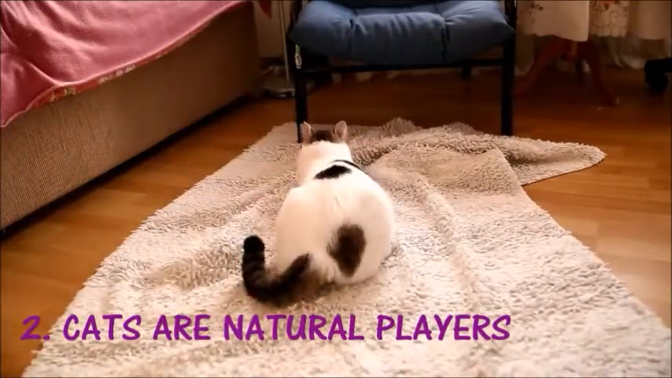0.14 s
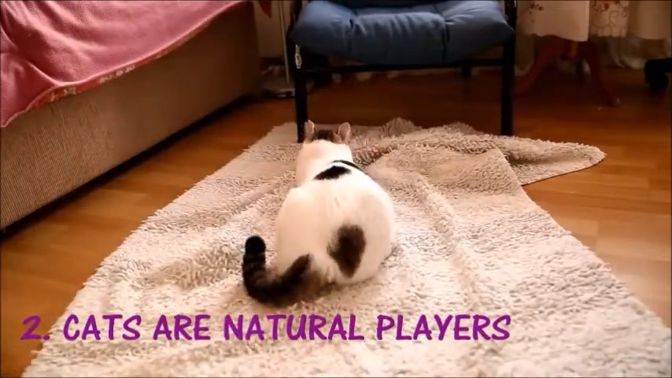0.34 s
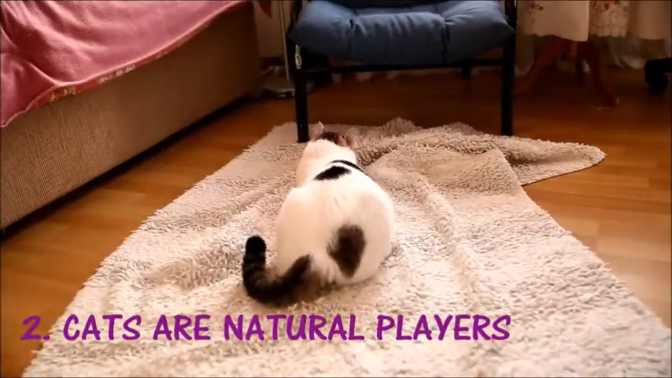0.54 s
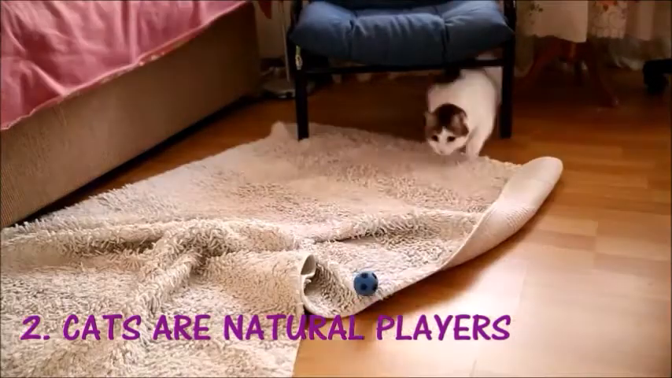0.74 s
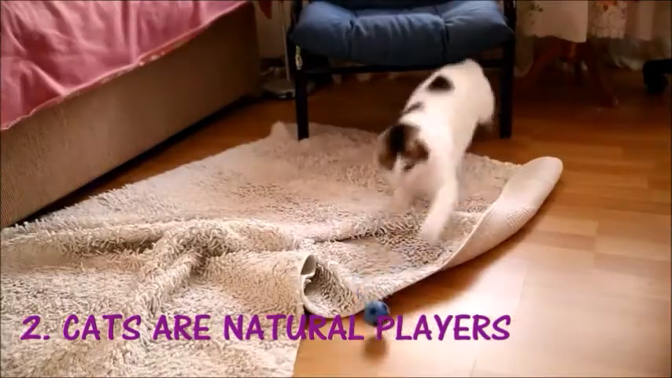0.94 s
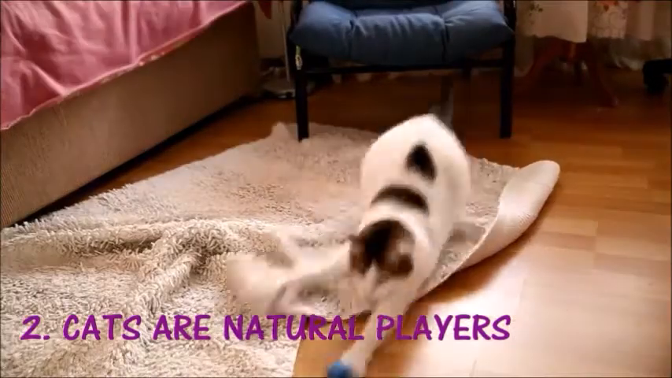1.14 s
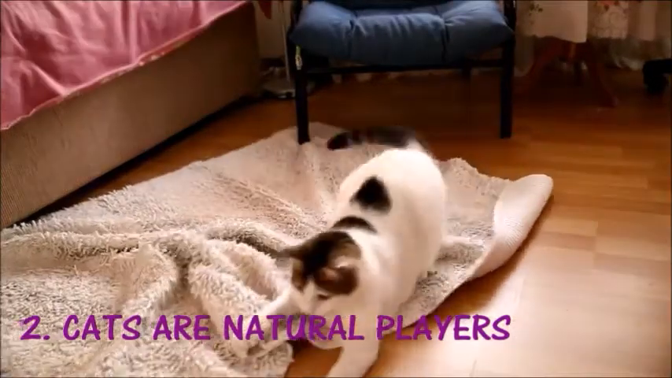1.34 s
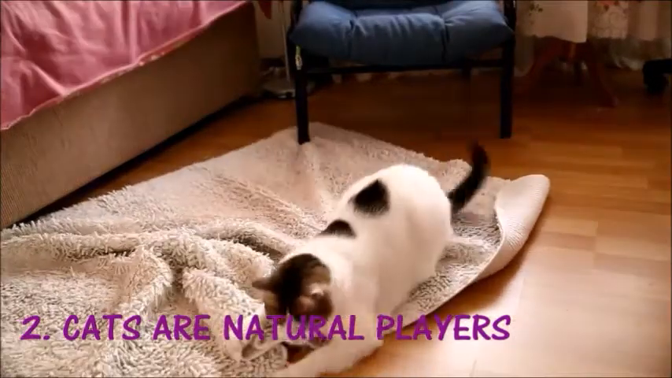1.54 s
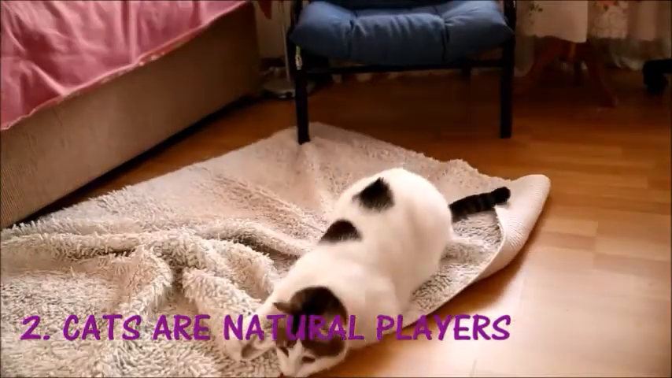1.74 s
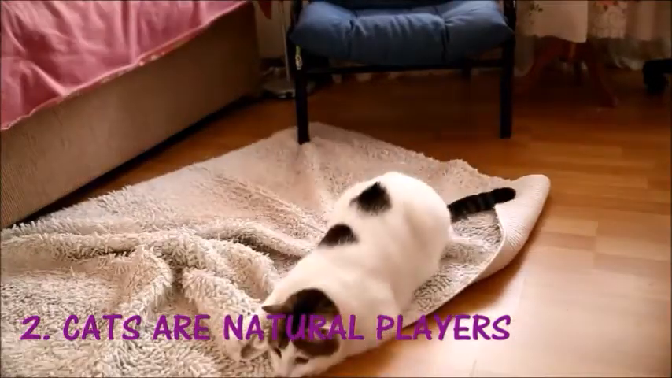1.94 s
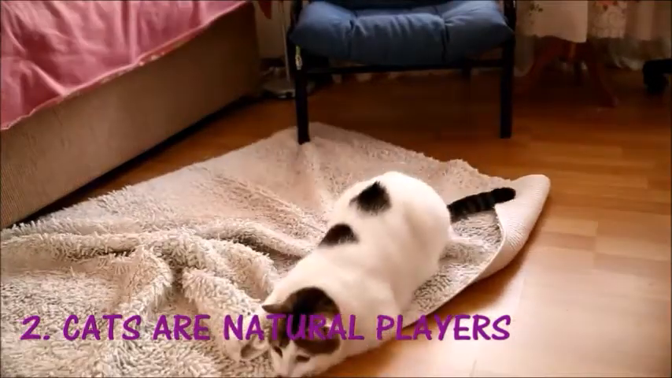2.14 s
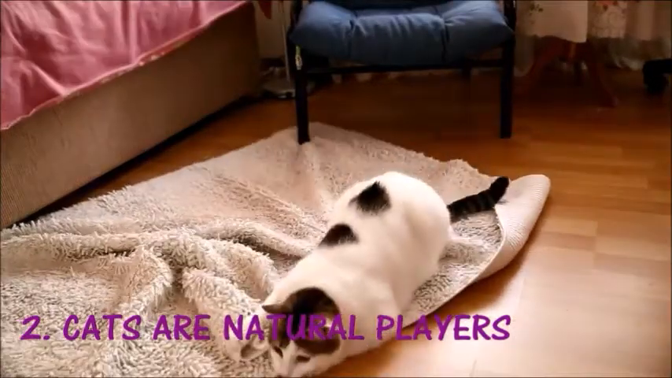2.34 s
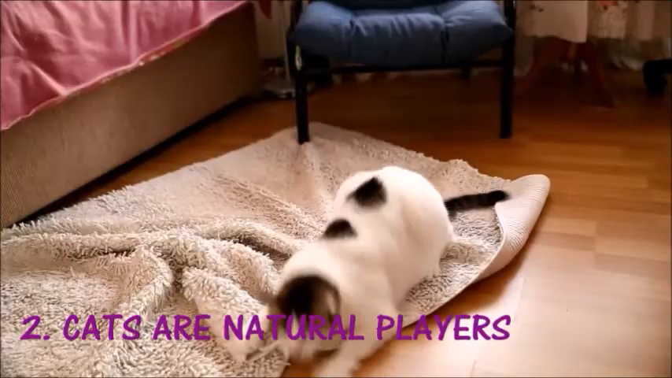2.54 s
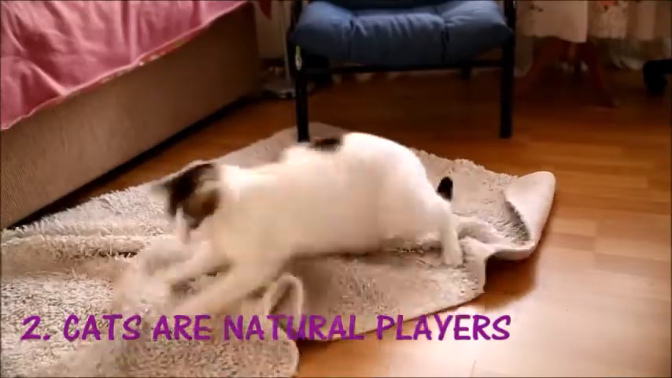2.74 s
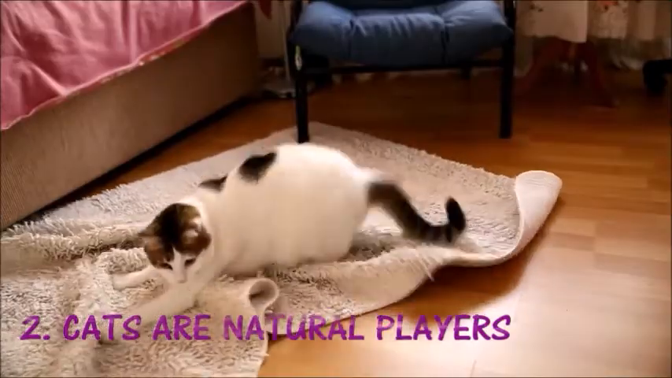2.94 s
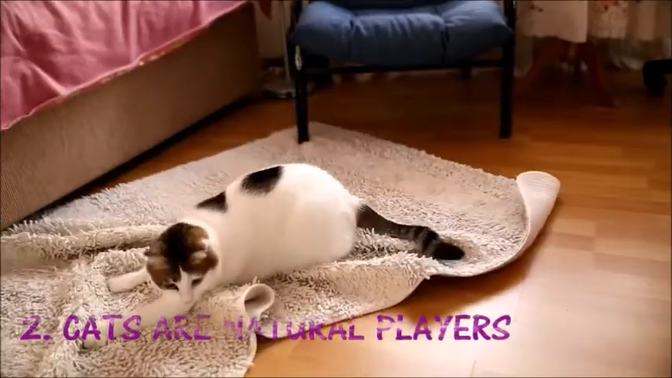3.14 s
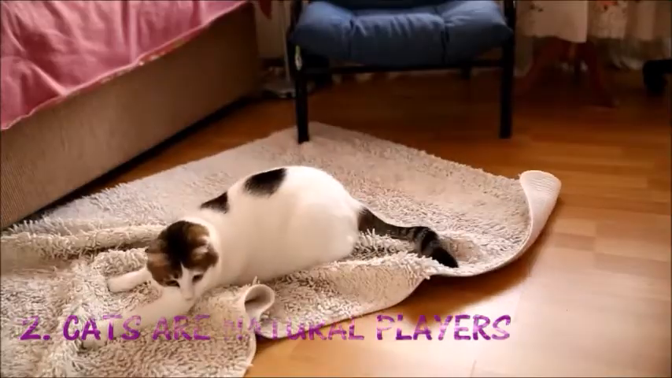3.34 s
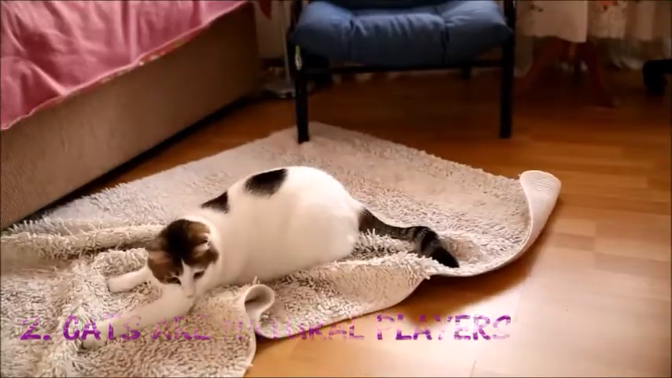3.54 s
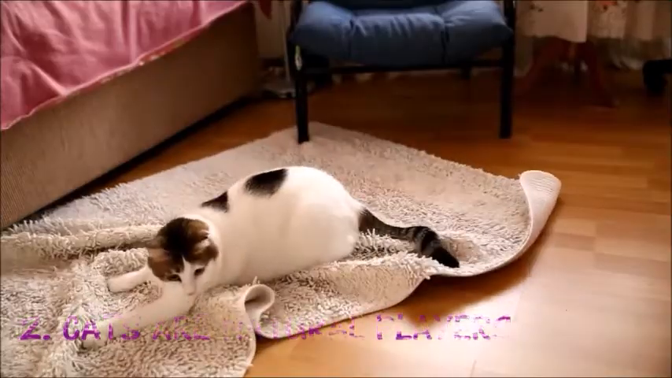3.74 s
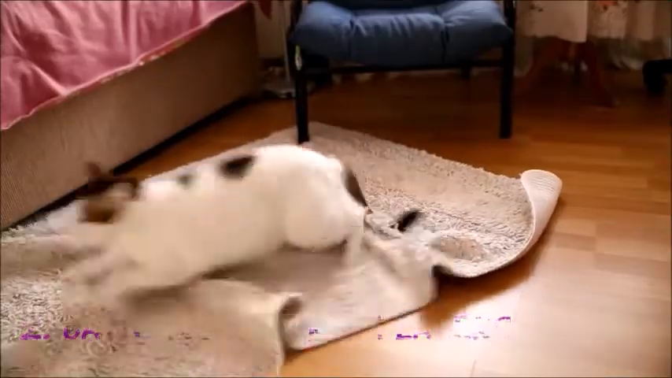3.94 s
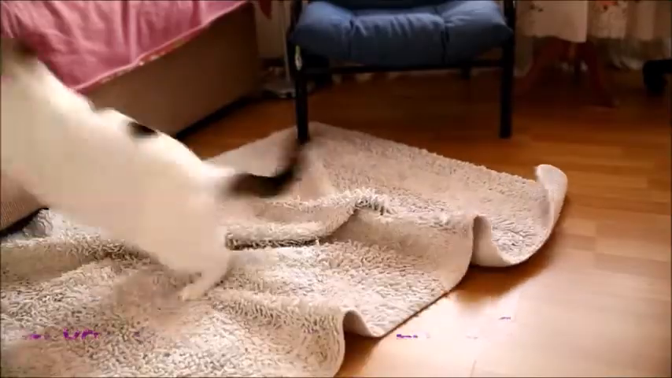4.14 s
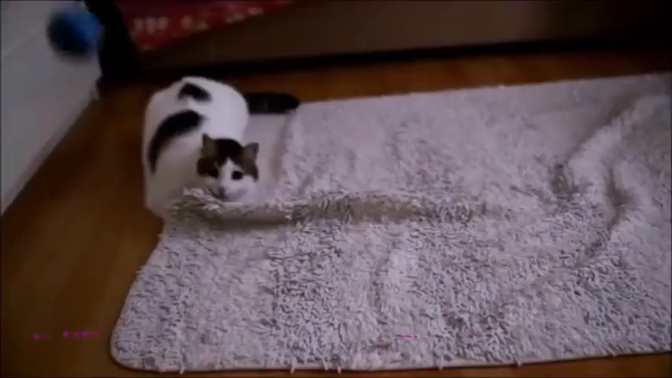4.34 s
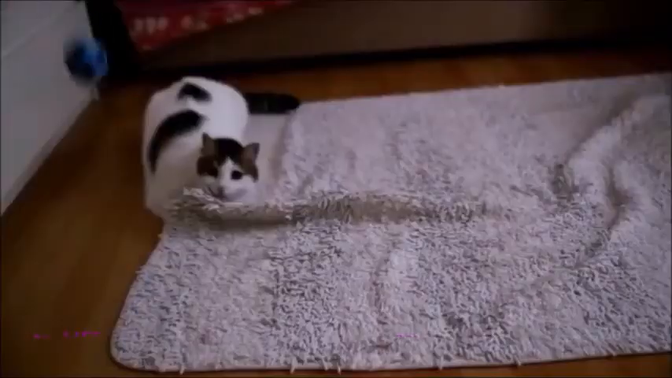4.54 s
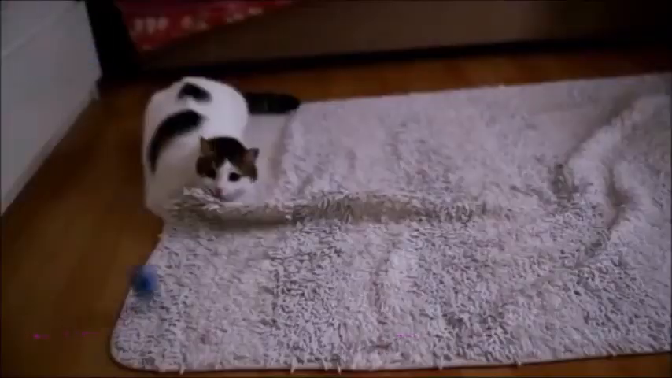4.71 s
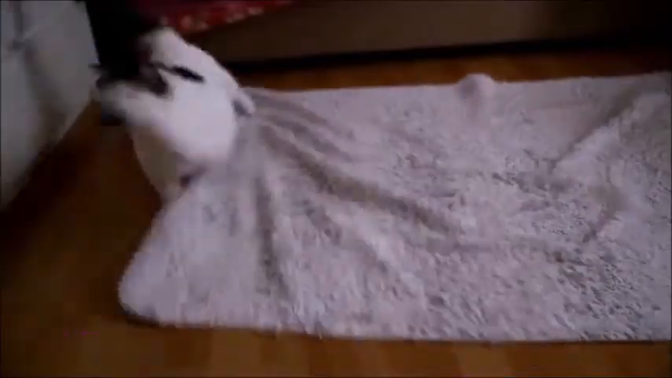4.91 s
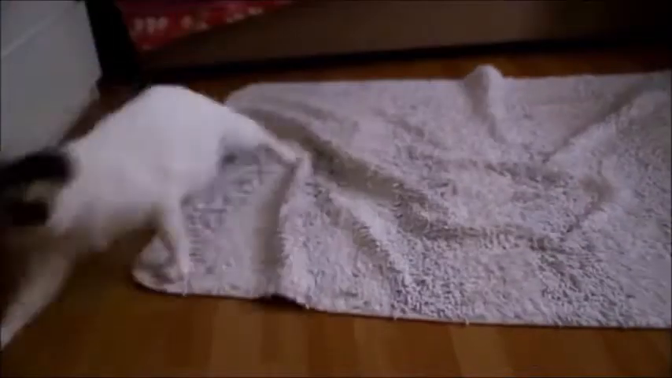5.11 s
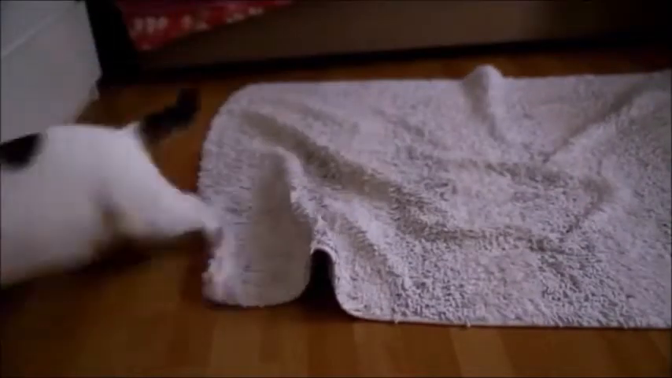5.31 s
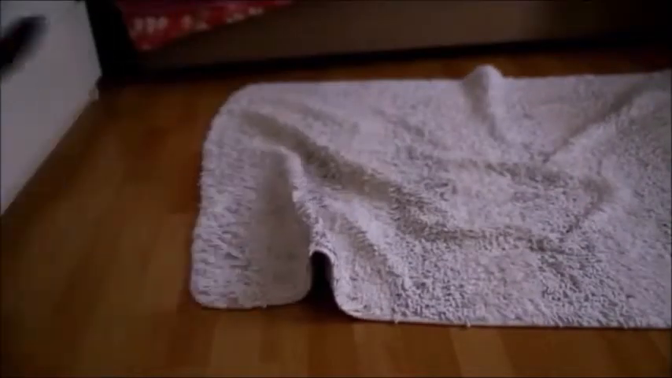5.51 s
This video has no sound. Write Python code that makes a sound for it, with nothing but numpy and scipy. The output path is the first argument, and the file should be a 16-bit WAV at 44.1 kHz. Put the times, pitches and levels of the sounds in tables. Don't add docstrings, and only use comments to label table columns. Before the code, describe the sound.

Room hush and faint hiss come first, then short woody knocks and thuds heard at a distance, with faint brushing of pile. Brief near-silences frame a repeat of the first few hits. One isolated knock breaks the next pause. The ending is close and much louder: rapid floor knocks, crisp claw snags in wool, rug rumble and soft hollow paw thumps.

```python
import sys
import numpy as np
from scipy import signal
from scipy.fft import rfft, irfft, next_fast_len
from scipy.io import wavfile
from scipy.ndimage import uniform_filter1d, map_coordinates

SR = 44100
rng = np.random.default_rng(int(sys.argv[2]) if len(sys.argv) > 2 else 0)


def boost(x):
    u = np.asarray(x, float) / 20
    return 10 ** u


def to_wav(sig):
    pcm = np.clip(np.atleast_2d(sig), -1, 1) * 32767
    pcm = np.round(pcm).astype(np.int16)
    wavfile.write(sys.argv[1], SR, pcm.T)


N = 245592
LAST_SHOT = 4.3


def unit(x):
    return x / np.sqrt(np.mean(x ** 2) + 1e-20)


def crest(x):
    return x / abs(x).max()


def along(points, hz):
    f, value = np.transpose(points)
    return np.interp(np.log(hz + 1), np.log(f + 1), value)


def filtered(x, response):
    size = next_fast_len(len(x) + 8192)
    return irfft(rfft(x, size) * response(np.fft.rfftfreq(size, 1 / SR)), size)[:len(x)]


def resonance(f, hz, width_hz):
    return 1j * f * width_hz / (hz * hz - f * f + 1j * f * width_hz)


def wobble(rate):
    return map_coordinates(rng.standard_normal(N // 20), [np.arange(N) * rate / SR])


def patchy(patchy_db):
    z = signal.stft(rng.standard_normal(N + 256), nperseg=256)[2]
    field = uniform_filter1d(rng.standard_normal(z.shape), size=8, axis=0)
    field = uniform_filter1d(field, size=6, axis=1)
    return signal.istft(z * boost(patchy_db * unit(field)), nperseg=256)[1][:N]


# start in seconds, peak level in dB,
# knock pitch in Hz, tick level in dB, thud level in dB (tick and thud against the knock).
FAR_KNOCKS = [(0.4741, -26, 1200, -2.5, -5), (0.5616, -21.5, 435, -38, -12), (0.7399, -33.5, 890, 3.5, -28),
              (0.818, -28.5, 560, -10, -12), (0.8666, -37, 382, 2, -13), (0.8757, -34, 374, -38, -2.5),
              (0.985, -31.5, 630, -3, -6.5), (0.9961, -33, 650, 4.5, -14), (1.0039, -28, 720, -4, -25),
              (1.0632, -42, 477, 7.5, -7), (1.1713, -22, 574, -17, -17), (1.2092, -35, 510, -7, -11),
              (1.3208, -28.5, 586, -30, -18), (1.3939, -26.5, 437, -22, -10.5),
              (1.4411, -36, 460, -13, -31), (1.5776, -50, 384, -20, 3), (1.5841, -36.5, 240, -7, -0.5),
              (1.6741, -37.5, 594, 3.5, -7), (1.7783, -33, 340, -9, -5.5), (1.8248, -26.5, 815, -23, -15),
              (1.8274, -28, 442, -16, -11), (3.6948, -25.5, 564, -3.5, -10)]
NEAR_KNOCKS = [(4.3381, -30, 710, -20, -8), (4.4597, -24.5, 1180, -6, -8), (4.5169, -37, 610, 2, -20),
               (4.5994, -12.5, 720, -7, -18.5), (4.612, -14.5, 624, -12, -15.5), (4.708, -10, 645, -2, -24),
               (4.8145, -13.5, 630, -18.5, -27), (5.0087, -25, 1380, 2, -3.5),
               (5.0689, -11.5, 1400, 2, -42), (5.0706, -16, 1180, -33, -23),
               (5.1323, -19.5, 610, -20, -9.5), (5.168, -26, 834, -9, -11), (5.299, -42, 607, -8, 13),
               (5.3576, -15.5, 750, 5, -8), (5.4391, -15, 560, -24, -16), (5.5376, -16, 490, -27.5, -6),
               (5.5458, -14.5, 544, -25, -0.5)]


def knocks():
    out = np.zeros(N + SR)
    t = np.arange(SR // 10) / SR
    blow = np.hanning(11)
    blow = np.pad(blow, (0, len(t) - len(blow)))
    thud = crest(filtered(boost(-60 * t / 0.0033), boards))
    for start, db, hz, tick_db, thud_db in FAR_KNOCKS + NEAR_KNOCKS:
        near = start > LAST_SHOT
        knock = crest(filtered(blow, lambda f: resonance(f, hz, 0.83 * hz) ** 3))
        scratch = rng.standard_normal(len(t)) * boost(-60 * t / 0.021)
        tick = crest(filtered(blow + 1.17 * scratch, lambda f: resonance(f, 2430, 3160) ** 3))
        hit = knock + boost(tick_db - 3) * tick + boost(thud_db) * thud
        tail = signal.fftconvolve(hit, walls())
        room_db = -4 if near else -6
        wet = boost(room_db) * filtered(tail, lambda f: hollow(f, near))
        first = round(start * SR)
        out[first:][:len(t)] += boost(db) * hit
        out[first:][:len(wet)] += boost(db) * wet
    return filtered(out[:N], lambda f: 1 / (1 + 1j * f / 11000) ** 4)


# pitch in Hz, width in Hz, level in dB.
BOARD_MODES = [(70, 28.4, -0.5), (119, 223, 1.5), (201.8, 28.8, 9.5), (305, 95, -1.5), (570, 23, -15.5)]


def boards(f):
    modes = enumerate(BOARD_MODES)
    return sum((-1) ** k * boost(db) * resonance(f, hz, width) for k, (hz, width, db) in modes)


# frequency in Hz, time to fall 60 dB in seconds.
ROOM_DECAY = [(60, 0.91), (500, 0.25), (2000, 0.28), (10000, 0.2)]


def walls():
    hz, t, z = signal.stft(rng.standard_normal(SR // 2), SR, nperseg=128)
    fade = boost(-60 * t / along(ROOM_DECAY, hz)[:, None])
    tail = signal.istft(z * fade, SR, nperseg=128)[1]
    tail = tail * (1 - np.exp(-np.arange(len(tail)) / SR / 0.0016))
    return tail / np.linalg.norm(tail)


# pitch in Hz, width in Hz,
# boost in dB with the microphone far, boost in dB with it near.
FLOOR_HOLLOW = (533, 78, 0.4, 4.9)


def hollow(f, near):
    hz, width_hz, far_db, near_db = FLOOR_HOLLOW
    return 1 + boost(near_db if near else far_db) * resonance(f, hz, width_hz)


# start in seconds, peak level in dB, centre in Hz, length in seconds.
CLAW_SNAGS = [(0.724, -33, 8200, 0.0053), (0.731, -33.5, 8000, 0.015), (1.136, -52, 8800, 0.011),
              (3.694, -44, 7760, 0.0054), (4.35, -21, 8000, 0.0069), (4.439, -22.5, 6600, 0.0065),
              (4.5996, -22.5, 8250, 0.014), (4.617, -20.5, 8200, 0.013), (4.648, -25, 5900, 0.009),
              (4.705, -24, 9200, 0.0093), (4.869, -22.5, 9200, 0.017), (4.889, -18, 8600, 0.018),
              (4.979, -21, 9300, 0.045), (5.068, -20, 9100, 0.0054), (5.266, -27.5, 8300, 0.027),
              (5.302, -34, 5460, 0.0091), (5.365, -28, 5900, 0.013), (5.532, -31.5, 5650, 0.017)]
# start in seconds, peak level in dB, centre in Hz, length in seconds.
PAW_SCUFFS = [
    (0.7235, -31.5, 2730, 0.011),
    (0.7484, -30, 4200, 0.007),
    (3.388, -50, 2090, 0.013),
    (4.355, -13.5, 3980, 0.0036),
    (4.895, -23, 3370, 0.028),
    (5.011, -23, 492, 0.021),
    (5.367, -13, 570, 0.052),
    (5.431, -13.5, 570, 0.023),
    (5.4523, -14, 537, 0.022),
    (5.5471, -10.5, 553, 0.02),
]


def snags():
    out = np.zeros(N + SR)
    t = np.arange(SR // 10) / SR
    for start, db, hz, length in CLAW_SNAGS + PAW_SCUFFS:
        noise = rng.standard_normal(len(t))
        rip = unit(filtered(noise, lambda f: resonance(f, hz, .55 * hz) ** 3))
        u = t / length
        swell = u ** 0.78 * np.exp(-2.2 * u * u - u)
        out[round(start * SR):][:len(t)] += boost(db + 0.5) * rip * swell
    return filtered(out[:N], lambda f: 1 / (1 + (f / 11500) ** 10))


def fibres(spectrum, rate, grain_db, patchy_db):
    chance = rng.random(N)
    size = np.clip(rng.standard_normal(N), -3, 3)
    grains = (chance < rate / SR) * size * abs(size)
    rough = patchy(patchy_db) + boost(grain_db) * unit(grains)
    return unit(filtered(rough, lambda hz: boost(along(spectrum, hz))))


def strokes(rows, narrow=1):
    now, power = np.arange(N) / SR, np.zeros(N)
    for peak, db, rise, fall in rows:
        around = slice(max(round((peak - .3) * SR), 0), round((peak + .3) * SR))
        away = now[around] - peak
        u = np.where(away < 0, -away / rise, away / fall)
        power[around] += boost(db - narrow * 10 * u ** 1.47) ** 2
    return np.sqrt(power)


# frequency in Hz, level in dB per Hz.
DRAG_COLOUR = [(40, -60), (60, -10), (120, -1), (240, -3.5), (330, 4.5), (700, -7), (1200, -11),
               (1800, -25), (3500, -55)]
# frequency in Hz, level in dB per Hz.
BRUSH_COLOUR = [(250, -70), (600, 2), (900, -2), (1900, -5), (3500, -4), (6700, -13.5), (8500, -14),
                (11000, -52)]
# frequency in Hz, level in dB per Hz.
RAKE_COLOUR = [(3240, -12), (5500, -7.5), (6780, -12.5), (8390, -7), (9550, -5.5), (12100, -16.5),
               (13100, -21.5), (14700, -29), (15600, -46)]
# peak time in seconds, level in dB, rise in seconds, fall in seconds.
RUG_SHOVES = [(.515, -40.5, 0.038, 0.076), (.585, -33, 0.066, 0.057), (.77, -38.5, 0.031, 0.049),
              (.86, -34.5, 0.042, 0.06), (.93, -46, .04, 0.083), (1.055, -39, 0.088, 0.066),
              (1.2, -34.5, 0.028, 0.037), (1.29, -51, .06, 0.1), (1.45, -42, 0.049, 0.05),
              (1.585, -33, 0.027, 0.045), (1.73, -41.5, 0.093, 0.061), (1.88, -38.5, 0.096, 0.033),
              (1.97, -57, .06, 0.085), (3.74, -49, 0.031, 0.028), (4.345, -41, 0.019, .035),
              (4.41, -49, .04, 0.092), (4.53, -32, 0.06, 0.023), (4.64, -25, 0.025, 0.033),
              (4.755, -25.5, 0.064, 0.021), (4.855, -25, 0.044, 0.018), (4.95, -38, 0.03, 0.038),
              (5.02, -31.5, 0.017, 0.025), (5.085, -24.5, 0.014, 0.032), (5.175, -34.5, 0.09, 0.033),
              (5.28, -50, .04, .06), (5.395, -34, .02, .025), (5.46, -46, .04, .07),
              (5.565, -21, 0.02, .04)]
# peak time in seconds, level in dB,
# rise in seconds, fall in seconds, claws over pile in dB.
FAR_SWEEPS = [(.475, -61, 0.0067, 0.034, -14), (.62, -57.5, 0.14, 0.21, -7),
              (.74, -46.5, 0.053, 0.071, -8.5), (.89, -52, .03, 0.054, -10.5),
              (.945, -56, 0.067, 0.046, 1.5), (.995, -48, 0.053, 0.081, -6.5),
              (1.2, -53.5, 0.076, 0.12, -2.5), (1.36, -56.5, .09, 0.14, -3.5), (1.47, -54, 0.047, 0.12, -3),
              (1.58, -51, 0.18, 0.097, -3.5), (1.72, -58.5, 0.15, 0.094, -8), (1.84, -53, 0.13, 0.093, -5),
              (1.97, -63, 0.1, 0.18, -6.5), (3.71, -59.5, 0.014, .065, -18)]
NEAR_SWEEPS = [(4.368, -37.5, 0.022, .05, -6), (4.455, -37, 0.059, 0.092, -6),
               (4.629, -33.5, 0.02, .055, -5), (4.725, -42, 0.078, 0.066, -9.5),
               (4.85, -50, 0.095, .04, 1.5), (4.905, -34, 0.032, 0.058, -1.5),
               (4.955, -39.5, 0.035, .035, -11), (5.014, -41, 0.1, 0.043, 3.5),
               (5.12, -45.5, 0.061, 0.039, -9), (5.205, -38.5, 0.045, 0.05, -2),
               (5.28, -43.5, 0.022, 0.051, -3), (5.368, -35, 0.013, 0.029, -14),
               (5.44, -40, .05, 0.085, -11), (5.545, -41.5, 0.015, 0.022, -15)]


def rug():
    drag = fibres(DRAG_COLOUR, 340, grain_db=-15, patchy_db=3) * boost(0.85 * wobble(30))
    brush = fibres(BRUSH_COLOUR, 1200, grain_db=-11, patchy_db=1.5) * boost(wobble(70))
    rake = fibres(RAKE_COLOUR, 2200, grain_db=-1.5, patchy_db=4.5) * boost(wobble(82))
    now = np.arange(N) / SR
    near_drag = unit(filtered(drag, lambda f: hollow(f, True) * (1j * f / (330 + 1j * f)) ** 3))
    drag = np.where(now < LAST_SHOT, drag, near_drag)
    sweeps = np.array(FAR_SWEEPS + NEAR_SWEEPS)
    pile = sweeps[:, :4]
    clawed = pile + np.outer(sweeps[:, 4], [0, 1, 0, 0])
    out = boost(-5) * drag * strokes(RUG_SHOVES)
    out += boost(-.3) * brush * strokes(pile)
    out += boost(-1) * rake * strokes(clawed, narrow=1.41)
    return out * ((now < SHOT_GAPS[0][0]) | (now > SHOT_GAPS[1][1]))


# start in seconds, peak level in dB, pitch in Hz,
# time to fall 60 dB in seconds.
WEIGHT_DROP = (1.82, -50, 56, .5)


def body():
    start, db, hz, t60 = WEIGHT_DROP
    t = np.clip(np.arange(N) / SR - start, 0, None)
    return boost(db - 60 * t / t60) * (1 - np.exp(-t / .03)) * np.sin(2 * np.pi * hz * t)


# frequency in Hz, level in dB per Hz.
HUSH_COLOUR = [(20, -42), (44, -2), (122, -8.5), (250, -7.5), (390, -12), (700, -10.5), (900, -13.5),
               (1150, -15.5), (2000, -19.5), (4500, -25.5), (6000, -39.5), (9000, -47)]
# frequency in Hz, level in dB per Hz.
HISS_COLOUR = [(2000, -60), (4000, -23), (6000, -2), (8200, -2.5), (9000, -5), (10200, -3), (10700, 0),
               (13300, -2.5), (14000, -6), (15700, -17)]
# pitch in Hz, width in Hz, rms level in dB.
DRONES = [(558, 52, -65.5), (650, 46, -84), (785.4, 75, -65), (874, 58, -67)]


def room_tone():
    out = boost(-61.5) * unit(filtered(patchy(1.0), lambda hz: boost(along(HUSH_COLOUR, hz))))
    out = out + boost(-78) * unit(filtered(patchy(1.5), lambda hz: boost(along(HISS_COLOUR, hz))))
    for hz, width_hz, db in DRONES:
        drone = filtered(rng.standard_normal(N), lambda f: resonance(f, hz, width_hz) ** 2)
        out = out + boost(db) * unit(drone * boost(3 * wobble(6)))
    return out


def scene():
    action = filtered(knocks() + snags() + rug(), lambda f: (1j * f / (45 + 1j * f)) ** 3)
    thin = filtered(action, lambda f: (1j * f / (140 + 1j * f)) ** 2)
    action = np.where(np.arange(N) < LAST_SHOT * SR, action, thin)
    mono = action + body() + room_tone()
    return np.array([mono, mono])


def coarse(x, contrast):
    hz, _, z = signal.stft(x, SR, nperseg=1024)
    local = np.sqrt(abs(uniform_filter1d(abs(z) ** 2, size=16, axis=0))) + 1e-12
    share = contrast * np.clip((hz[:, None] - 3000) / 4000, 0, 1)
    return signal.istft(z * (abs(z) / local) ** share, SR, nperseg=1024)[1][:N]


def low_pass(x):
    return signal.sosfilt(signal.butter(12, 15700, fs=SR, output="sos"), x)


# start in seconds, end in seconds.
SHOT_GAPS = [
    (2.028, 2.060),
    (2.996, 3.028),
]
# frequency in Hz, side over mid in dB.
SIDE_LEVEL = [(60, -59), (110, -60), (200, -63), (380, -51), (700, -58), (1290, -52), (2380, -39),
              (4400, -23), (8120, -16.5), (15000, -3.5)]


def record(dry):
    mid = dry[0] / (1 + abs(dry[0] / .3) ** 4) ** (1 / 4)
    mid = filtered(coarse(mid, contrast=0.52), lambda hz: hz < 15720)
    replay_lag, replay_end = 94095, 133000
    mid[replay_lag:replay_end] = mid[:replay_end - replay_lag]
    for start, end in SHOT_GAPS:
        mid[round(start * SR):round(end * SR)] *= boost(-41.5)
    hz, _, z = signal.stft(mid, SR, nperseg=256)
    random_phase = np.exp(2j * np.pi * rng.random(z.shape))
    turned = z * random_phase * boost(along(SIDE_LEVEL, hz) + 4)[:, None]
    side = signal.istft(turned, SR, nperseg=256)[1][:N]
    return low_pass(np.array([mid + side, mid - side]))


dry = scene()
out = record(dry)
to_wav(out)
```